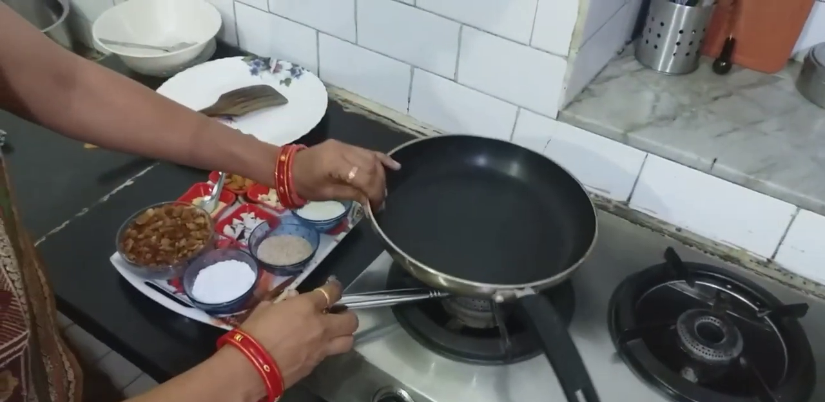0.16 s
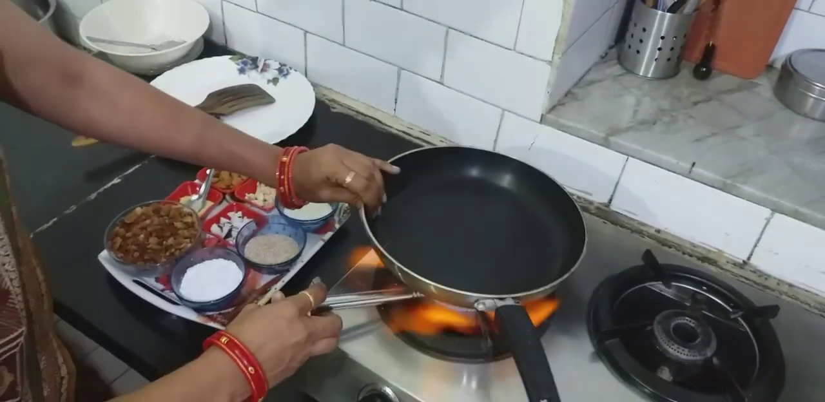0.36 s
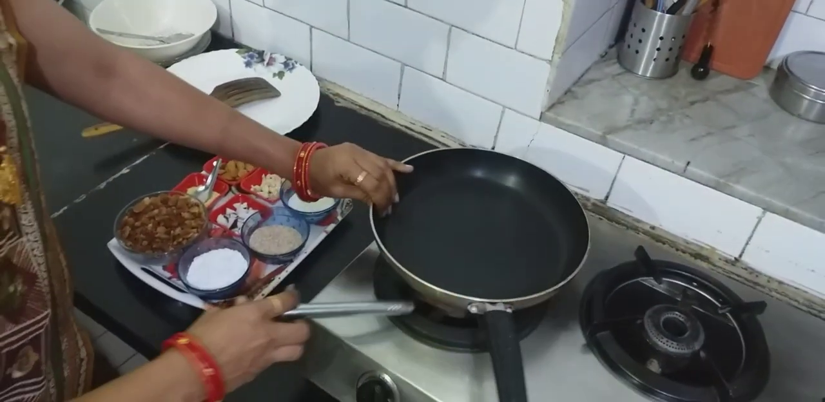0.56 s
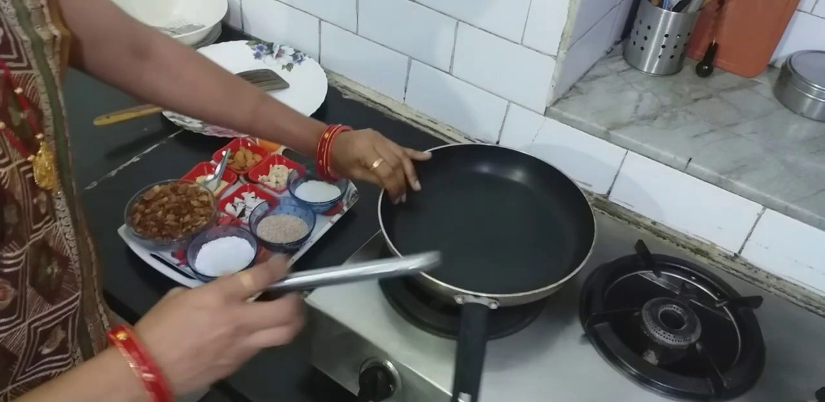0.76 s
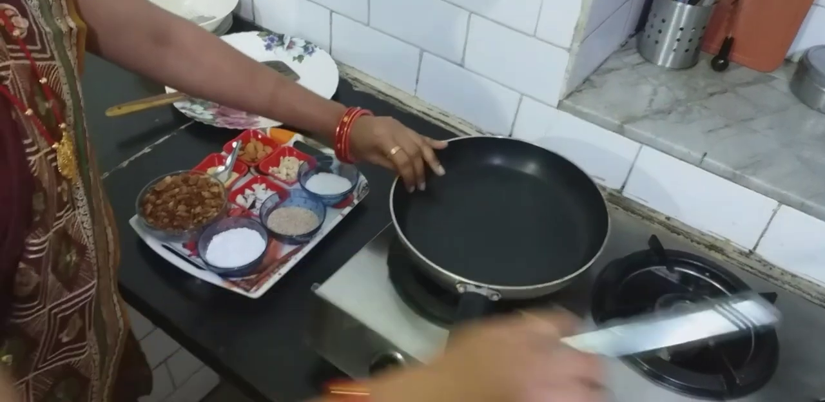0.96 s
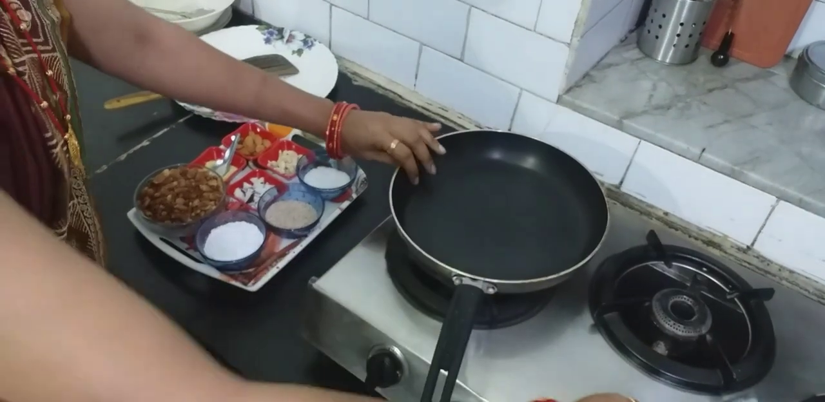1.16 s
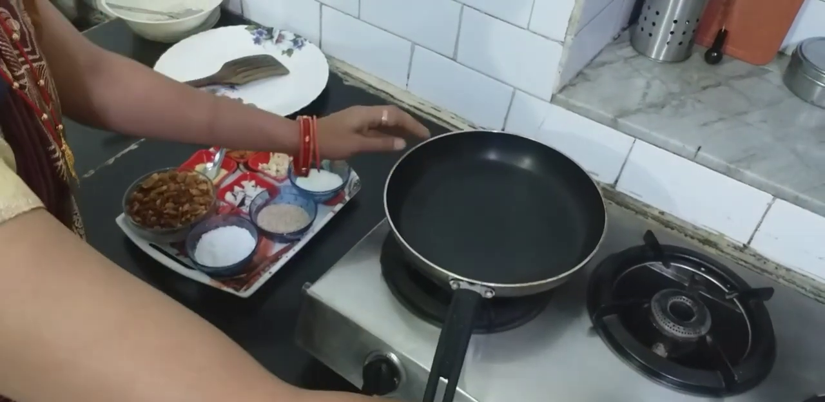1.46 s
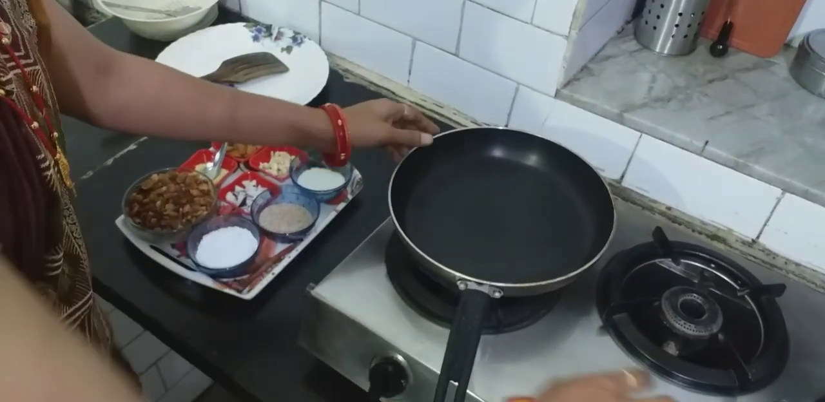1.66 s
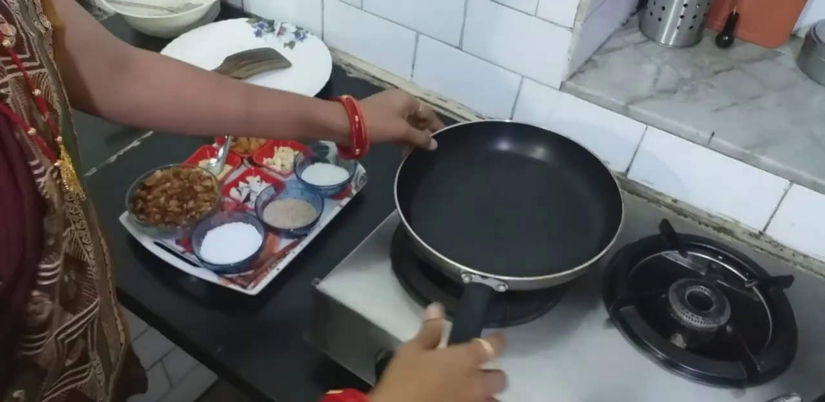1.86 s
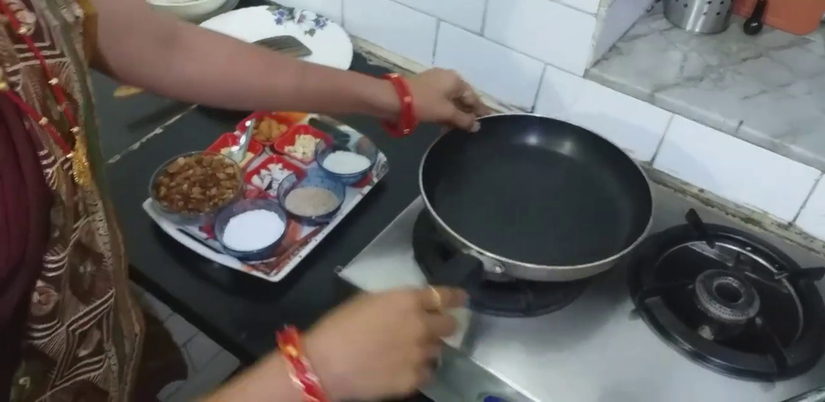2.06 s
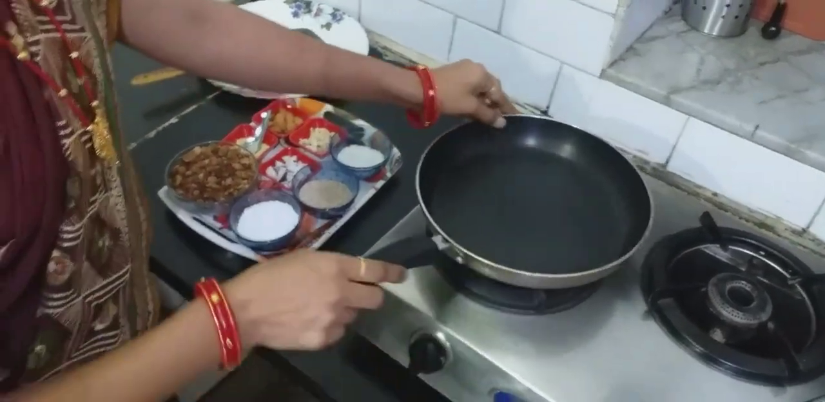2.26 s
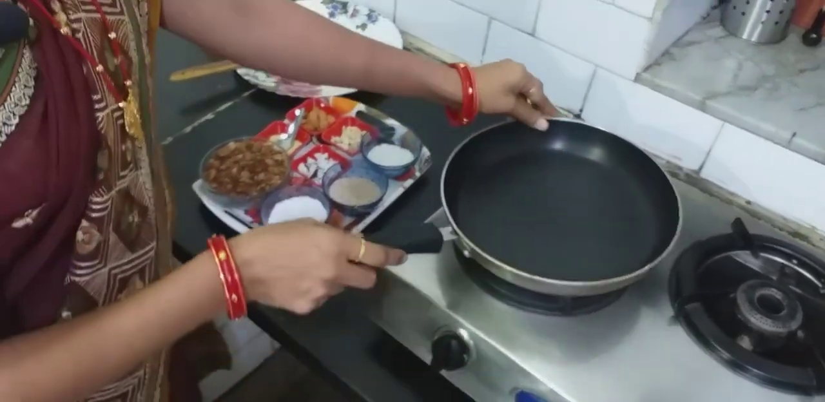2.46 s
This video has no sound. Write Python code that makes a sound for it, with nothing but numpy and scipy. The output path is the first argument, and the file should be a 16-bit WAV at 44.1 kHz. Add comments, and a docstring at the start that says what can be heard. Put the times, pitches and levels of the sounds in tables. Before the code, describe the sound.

A frying pan clanks and scrapes on a gas burner in an echoing tiled kitchen. After a faint swish and squeak, a lighter snaps at 0.2 seconds and gas catches with a soft thump. The pan clanks down, ringing, at 0.35. The lighter taps at 1.3 and lands sharply on the counter at 1.5. From 1.9 to 2.5 the pan scrapes and knocks into place.

```python
"""A faint swish and squeak, then a spark lighter snaps under a frying pan and the gas catches
with a soft thump. The pan clanks down on the burner grate, the lighter is put down on the counter,
and the pan is scraped and knocked into place, its metal ringing. The place is a tiled kitchen.
The stove is straight ahead of the microphone, far enough off that the hard walls
give back more of every blow than arrives directly."""
import sys
import numpy as np
from scipy import signal
from scipy.io import wavfile
from scipy.ndimage import uniform_filter1d

SR = 44100
rng = np.random.default_rng(int(sys.argv[2]) if len(sys.argv) > 2 else 0)


def materialize(psi):
    """Save the field psi as 16-bit PCM at rate SR to the path in sys.argv[1].

    A 1-D psi becomes a single channel; in a 2-D psi each row is a channel.
    """
    bounded = np.clip(np.atleast_2d(psi).T, -1, 1)
    quanta = np.round(bounded * 32767).astype(np.int16)
    wavfile.write(sys.argv[1], SR, quanta)


N = 114660
T = np.arange(N) / SR
AGE = T[:SR]  # seconds since a blow

# Reverberation of the tiled kitchen. Each row: frequency in Hz, t60 in seconds.
ROOM_DECAY = [(100, 0.94), (400, 0.69), (1000, 0.9), (2800, .6), (7000, 0.4), (11000, 0.34), (16000, 0.28)]
# Spectra of the sounds at the microphone. Each row: frequency in Hz, relative level in dB.
ROOM_TONE_COLOUR = [(25, -31.5), (60, -2), (150, 1), (300, -4.5), (700, -7.5), (1500, -14), (2600, -16.5),
                    (4000, -14), (6000, -15), (9000, -28), (15500, -28)]
SWISH_COLOUR = [(1000, -24), (2500, -13), (3600, -1.5), (4500, -4.5), (6000, -13), (9000, -25),
                (15000, -32.5)]
RUSTLE_COLOUR = [(2000, -20), (6000, 10), (9000, -8), (11500, -5), (15500, -26)]
FLAME_COLOUR = [(25, -31.5), (40, -21), (55, -7.5), (100, 0.5), (220, 3.5), (310, -5.5), (370, -17),
                (450, -13.5), (700, -27.5), (2000, -61)]
SNAP_COLOUR = [(25, -40), (60, -18), (200, -10.5), (500, 2), (1100, -3), (1400, -9), (2300, -7),
               (3600, 0.5), (4800, -2), (7600, 5.5), (9200, -9.5), (10500, -1.5), (12000, -7), (13300, 0),
               (16000, -10.5)]
TAP_COLOUR = [(60, -24.5), (300, -21), (550, -3), (1000, 1.5), (1400, -9), (2100, -7.5), (2800, -17.5),
              (4000, -7.5), (5900, -29), (7700, -13), (9400, -26.5), (11200, -15.5), (13500, -25),
              (15500, -24)]
KNOCK_COLOUR = [(25, -45), (60, -27), (150, -18.5), (240, -5.5), (360, -14), (450, -6), (800, -4),
                (1170, -8), (1350, -13), (1700, -10), (2600, -12), (3900, -7), (4700, -10), (7500, -9),
                (9300, -23), (11000, -13.5), (15500, -18)]
GRIT_COLOUR = [(25, -26), (55, -30), (100, 1), (300, -1.5), (600, 7), (900, 1), (1400, -0.5), (2200, 1),
               (4000, -6.5), (6000, -7), (8000, -6.5), (9500, -22.5), (15500, -46)]
CLANK_COLOUR = [(25, -40), (60, -13), (200, -1.5), (650, 10.5), (1400, 1.5), (2200, 5.5), (4200, 1),
                (6200, 1), (7800, -9), (9300, -22.5), (15500, -28)]
SIDE_COLOUR = [(7000, 6), (8000, 5), (9200, -9), (10500, -7), (15500, -8), (17000, -40)]
# Swell of the room tone and of the catching gas. Each row: time in seconds, level in dB.
ROOM_TONE_LEVEL = [(0, -56), (.19, -57), (.6, -56), (.8, -56.5), (1.0, -66.5), (1.28, -73), (1.6, -50),
                   (2.6, -57)]
FLAME_LEVEL = [(.2, -60), (.22, -31), (.26, -32), (.30, -38), (.36, -48), (.6, -68.5), (.9, -77)]
# Faint sounds in the room. Each row: peak time in seconds, level in dB, width in seconds.
SWISHES = [(.0, -60, 0.051), (.10, -53, 0.076), (.84, -67, 0.061), (1.12, -68, .07)]
RUSTLES = [(.525, -59, 0.0072), (.585, -53, 0.047)]
SQUEAKS = [(.09, -57, 0.047), (.82, -63.5, 0.044), (1.11, -69, 0.045)]
# Low modes rung by the gas, and modes of the counter.
# Each row: frequency in Hz, relative level in dB, t60 in seconds.
THUMP_MODES = [(58, -9, .6), (97, 0, .4), (117, -2, .6), (146, -3, .85), (191, 1, .5), (240, -14, 1.0),
               (439, -8, .5)]
COUNTER_MODES = [(319, -7, .6), (439, -5, .55), (538, -4, .55), (645, -1, .5), (827, 0, .55),
                 (1005, -2, .5), (1191, 0, .4), (1701, -5, .42), (4125, -5, .3), (4495, -7, .4)]
# The lighter's tip touches the counter. Each row: start in seconds, level in dB, body shelf in dB.
TIP_TAPS = [(1.3028, -37.5, -2.5), (1.333, -40, 15), (1.385, -46.5, 6)]
# The lighter lands on the counter. Each row: start in seconds, level in dB, rattle t60 in seconds,
# then direct sound, body shelf and treble shelf in dB.
COUNTER_KNOCKS = [(1.5015, -60, 0.012, -3, -12, -0.5), (1.5300, -17.5, 0.096, -8.5, -4, -2),
                  (1.755, -36, 0.041, -4.5, -3.5, -4.5)]
# Modes of the pan. Each row: frequency in Hz, relative level in dB and t60 in seconds when struck,
# relative level in dB when scraped.
PAN_MODES = [(318, -30, .6, -4), (517, -26, .5, -6), (702, -15, .5, -5), (862, -26, .4, -9),
             (1543, -10, .58, -11), (1846, -28, .4, -8), (1906, -11, .48, -9), (2207, 0, .48, -4),
             (2412, -28, .3, -9), (2683, -12, .42, -12), (3039, 0, .4, -1), (3085, -16, .35, -4),
             (3499, -12, .38, -15), (3961, -12, .48, 0), (4045, -22, .3, -2), (4630, -11, .36, -14),
             (4818, -24, .3, -1), (4985, -19, .42, -5), (5912, -11, .36, -1), (6185, -10, .38, -5),
             (6853, -28, .3, -8), (7225, -7, .34, -12), (8750, -23, .25, -22), (10150, -28, .25, -35),
             (11820, -24, .24, -28)]
# Upper modes of the pan. Each row: frequency in Hz, relative level in dB.
SQUEAL_MODES = [(7849, -3), (8100, -1.5), (8662, -3), (10142, -4.5), (10900, -7.5), (11746, -1.5),
                (12500, -11), (13485, -6), (14200, -5), (15385, -7.5)]
# The pan slides on the grate. Each row: time in seconds, then grit, singing and squeal in dB.
SLIDE_LEVELS = [(1.86, -67, -64, -80), (1.90, -42, -40, -70), (1.98, -40, -39, -82),
                (2.03, -47, -44.5, -51), (2.11, -43, -44.5, -54), (2.19, -36, -35.5, -44.5),
                (2.24, -48, -41.5, -65), (2.32, -68, -62, -61), (2.40, -47.5, -56, -68),
                (2.48, -56, -70, -65), (2.6, -65, -72, -90)]
# The pan hits the grate. Each row: start in seconds, then clack, body shelf, treble shelf and ring in dB.
PAN_CLANKS = [(0.3531, -30.5, -2, 7, -19.5), (.706, -49.5, 10.5, -17.5, -71), (1.876, -40, 3.5, -6, -60),
              (1.8853, -34, -8, -6, -39.5), (1.9512, -37, 1.5, -1.5, -36.5), (2.0668, -32, 4.5, -24, -44),
              (2.1093, -41.5, 1, -7, -57.5), (2.3435, -41, 0, -0.5, -54)]

BODY_HZ, TREBLE_HZ = 1190, 6760  # shelf corners
ATTACK = 2205  # samples: a blow's level is set over its first 50 ms


def amp(db):
    """Decibels to gain."""
    return 10 ** (np.asarray(db) / 20)


def unit_rms(x, size=None):
    """Scales to rms 1, over the first samples or over all."""
    return x / np.sqrt(np.mean(x[:size] ** 2) + 1e-20)


def at_hz(points, hz):
    """Reads a table on a log-frequency axis."""
    f, value = np.transpose(points)
    return np.interp(np.log(hz + 1), np.log(f + 1), value)


def level(table, column=1):
    """Gain over time from one dB column; silent until 30 ms before the first row."""
    table = np.array(table)
    return amp(np.interp(T, table[:, 0], table[:, column])) * (T >= table[0, 0] - .03)


def swell(s, db, width):
    """A bell-shaped rise and fall in gain."""
    return amp(db) * np.exp(-((T - s) / width) ** 2 / 2)


def add(mix, s, sound):
    """Mixes a sound in at s seconds."""
    part = mix[round(s * SR):][:len(sound)]
    part += sound[:len(part)]


def through(x, response):
    """Convolves and keeps the length."""
    return signal.fftconvolve(x, response)[:len(x)]


def coloured(x, colour, body_db=0, treble_db=0):
    """Minimum-phase filter from a spectrum, with a low and a high shelf."""
    hz = abs(np.fft.fftfreq(4096, 1 / SR))
    low = 1 / (1 + (hz / BODY_HZ) ** 4)
    high = 1 - 1 / (1 + (hz / TREBLE_HZ) ** 4)
    log_gain = np.log(amp(at_hz(colour, hz) + body_db * low + treble_db * high))
    spectrum = np.exp(np.conj(signal.hilbert(log_gain)))
    return through(x, np.fft.ifft(spectrum).real[:len(hz) // 2])


def ring(modes):
    """Struck modes: decaying sines of random polarity."""
    return sum(amp(db - 60 * AGE / t60) * np.sin(2 * np.pi * hz * AGE) * rng.choice([-1, 1])
               for hz, db, t60 in modes)


def room_tone():
    """The quiet, low noise of the kitchen."""
    return level(ROOM_TONE_LEVEL) * unit_rms(coloured(rng.standard_normal(N), ROOM_TONE_COLOUR))


def swishes(rows, colour):
    """Soft swells of noise, faint at the microphone."""
    return sum(swell(*row) for row in rows) * unit_rms(coloured(rng.standard_normal(N), colour))


def squeaks(centre_hz=3970, sag_hz_per_s=5400, band_hz=400):
    """Narrow bands of noise that swell and sink in pitch."""
    out = np.zeros(N)
    lowpass = signal.butter(2, band_hz / 2, fs=SR, output="sos")
    for s, db, width in SQUEAKS:
        fuzz = unit_rms(signal.sosfilt(lowpass, rng.standard_normal(N)))
        turns = centre_hz * (T - s) - sag_hz_per_s * (T - s) ** 2 / 2
        out += swell(s, db, width) * fuzz * np.sqrt(2) * np.sin(2 * np.pi * turns)
    return out


def kitchen_echo(build_s=.002, first_echo_s=.009, echo_db=-8):
    """A few reflections off the tiles and a dense tail that dies faster in the treble; energy 1."""
    hz, t, spectra = signal.stft(rng.standard_normal(SR), SR, nperseg=256)
    decay = amp(-60 * t / at_hz(ROOM_DECAY, hz)[:, None])
    tail = signal.istft(spectra * decay, SR, nperseg=256)[1][:SR]
    tail *= 1 - np.exp(-AGE / build_s)
    tail /= np.linalg.norm(tail)
    for late, size in rng.random(size=(8, 2)):
        tail[int(first_echo_s * (1 + late) * SR)] += amp(echo_db) * (size - .5)
    return tail / np.linalg.norm(tail)


def blow(colour, rattle_s, direct_db, body_db=0, treble_db=0, chatter=1.0):
    """A hard contact and its brief rattle reach the microphone directly; the walls answer the hit."""
    rattle = rng.standard_normal(SR) * amp(-60 * AGE / rattle_s)
    contact = chatter * rattle / np.linalg.norm(rattle)
    contact[0] += 1  # the hit itself
    direct = amp(direct_db) * contact / np.linalg.norm(contact)
    return unit_rms(coloured(direct + kitchen_echo(), colour, body_db, treble_db), ATTACK)


def flame(thump_s=.243, thump_db=-28, rise_s=.0048):
    """The gas catches: a low puff that leaves the room booming."""
    out = level(FLAME_LEVEL) * unit_rms(coloured(rng.standard_normal(N), FLAME_COLOUR))
    thump = ring(THUMP_MODES) * (1 - np.exp(-AGE / rise_s))
    add(out, thump_s, amp(thump_db) * unit_rms(thump, ATTACK))
    return out


def lighter_snap(start_s=.2045, db=-21.5, echo_delay_s=.0105, echo_db=-1.5):
    """The spark snaps under the pan and its sound rebounds off the wall."""
    out = np.zeros(N)
    add(out, start_s, amp(db) * blow(SNAP_COLOUR, rattle_s=.024, direct_db=-8))
    rebound = blow(SNAP_COLOUR, rattle_s=.02, direct_db=-13.5)
    add(out, start_s + echo_delay_s, amp(db + echo_db) * rebound)
    return out


def lighter_put_down(ring_db=-5):
    """The tip taps dully, then the steel tube lands and rings the counter."""
    out = np.zeros(N)
    for s, db, body_db in TIP_TAPS:
        add(out, s, amp(db) * blow(TAP_COLOUR, rattle_s=.018, direct_db=-8.5, body_db=body_db))
    for s, db, rattle_s, direct_db, body_db, treble_db in COUNTER_KNOCKS:
        counter = amp(ring_db + body_db) * unit_rms(ring(COUNTER_MODES), ATTACK)
        knock = blow(KNOCK_COLOUR, rattle_s, direct_db, body_db, treble_db, chatter=4.9)
        add(out, s, amp(db) * (knock + counter))
    return out


def pan_slide(slips_per_s=2000, spread_db=3, t60_ratio=.28, squeal_t60_s=.012):
    """Tiny slips on the grate grind and make the pan sing, with a shorter ring than when struck."""
    slips = (rng.random(N) < slips_per_s / SR) * rng.standard_normal(N)
    slips *= amp(spread_db * rng.standard_normal(N))
    pan_ring = ring([(hz, db, t60_ratio * t60) for hz, _, t60, db in PAN_MODES])
    upper_ring = ring([(hz, db, squeal_t60_s) for hz, db in SQUEAL_MODES])
    grit = unit_rms(coloured(slips, GRIT_COLOUR)) * level(SLIDE_LEVELS, column=1)
    sing = unit_rms(through(slips, pan_ring)) * level(SLIDE_LEVELS, column=2)
    squeal = unit_rms(through(slips, upper_ring)) * level(SLIDE_LEVELS, column=3)
    direct = grit + sing + squeal
    return .69 * direct + .78 * through(direct, kitchen_echo())


def pan_clanks(twin_ratio=1.00205, twin_db=-7.5, room_db=-4):
    """Each contact clacks the grate and rings the pan; every mode has a close twin that beats with it."""
    tone = np.zeros(SR)
    for hz, db, t60, _ in PAN_MODES:
        phase = 2 * np.pi * hz * AGE
        tone += amp(db - 60 * AGE / t60) * (np.sin(phase) + amp(twin_db) * np.sin(twin_ratio * phase))
    out = np.zeros(N)
    for s, clack_db, body_db, treble_db, ring_db in PAN_CLANKS:
        echo = through(tone * amp(-300 * AGE), kitchen_echo())  # the walls answer the start of the ring
        add(out, s, amp(ring_db) * unit_rms(tone + amp(room_db) * echo, ATTACK))
        clack = blow(CLANK_COLOUR, rattle_s=.034, direct_db=-4,
                     body_db=body_db, treble_db=treble_db, chatter=3.8)
        add(out, s, amp(clack_db) * clack)
    return out


def scene(side_hz=7500, side_db=-11.5):
    """Everything stands straight ahead; only the top treble differs between left and right."""
    mid = lighter_snap() + lighter_put_down() + flame() + pan_clanks() + pan_slide()
    mid += squeaks() + room_tone() + swishes(SWISHES, SWISH_COLOUR) + swishes(RUSTLES, RUSTLE_COLOUR)
    highpass = signal.butter(10, side_hz, "high", fs=SR, output="sos")
    treble, scatter = signal.sosfilt(highpass, [mid, rng.standard_normal(N)])
    treble_envelope = np.sqrt(abs(uniform_filter1d(treble ** 2, size=128)))
    side = treble_envelope * unit_rms(coloured(scatter, SIDE_COLOUR))
    return mid + amp(side_db) * np.array([side, -side])


def record(dry):
    """The microphone feeds the recorder's 42 Hz rumble filter and 15.8 kHz band limit."""
    rumble_filter = signal.butter(4, 42, "high", fs=SR, output="sos")
    band_limit = signal.firwin(401, 15800, window=("kaiser", 8), fs=SR)
    return signal.oaconvolve(signal.sosfilt(rumble_filter, dry), band_limit[None], "same")


dry = scene()
out = record(dry)
materialize(out)
```